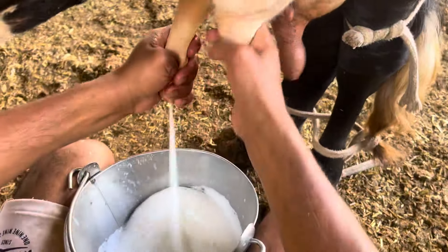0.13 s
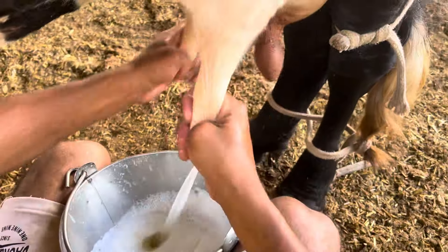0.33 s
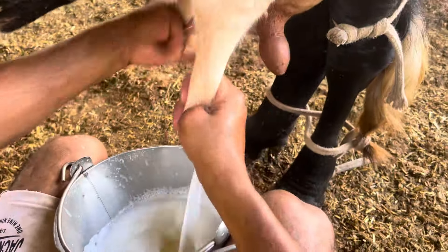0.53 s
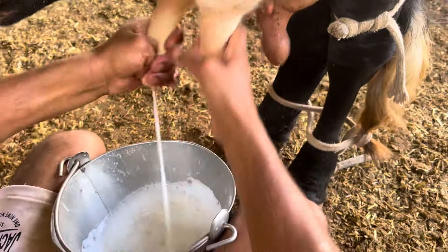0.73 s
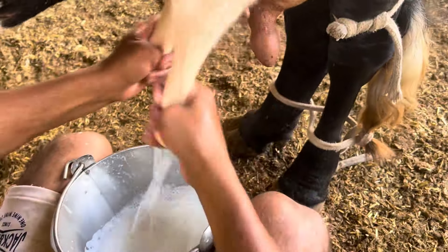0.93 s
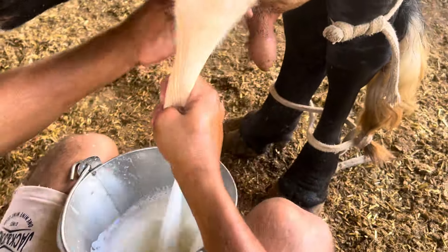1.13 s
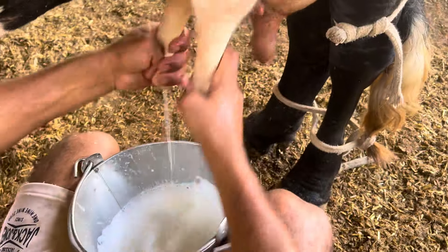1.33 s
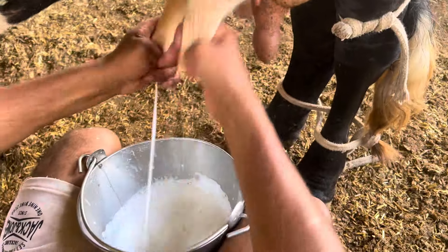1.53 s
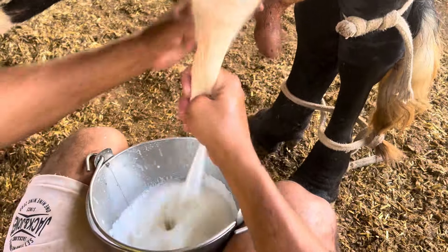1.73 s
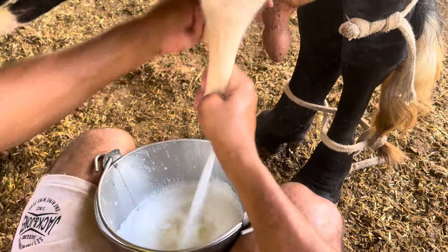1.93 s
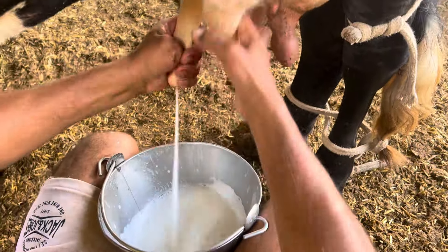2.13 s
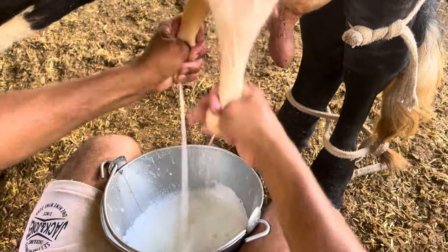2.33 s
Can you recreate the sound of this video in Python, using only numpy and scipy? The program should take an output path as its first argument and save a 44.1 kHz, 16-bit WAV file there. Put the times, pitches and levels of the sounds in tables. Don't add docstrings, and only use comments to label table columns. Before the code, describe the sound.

Alternating spurts of milk rush into foamy liquid in a metal pail, hissing, fizzing and gurgling without long gaps; soft hoof thuds and a brief bird twitter sit far behind, outdoors, heard close in wide stereo.

```python
import sys
import numpy as np
from scipy import signal
from scipy.fft import rfft, irfft, next_fast_len
from scipy.io import wavfile
from scipy.ndimage import uniform_filter1d

SR = 44100
rng = np.random.default_rng(int(sys.argv[2]) if len(sys.argv) > 2 else 0)


def field_ratio(decibels):
    return 10 ** (np.asarray(decibels, dtype=float) / 20)


def wav_record(signal):
    frames = np.transpose(np.atleast_2d(signal))
    bounded = np.clip(frames, -1, 1)
    quanta = np.round(bounded * 32767).astype(np.int16)
    wavfile.write(sys.argv[1], SR, quanta)


N = 108706
T = np.arange(N) / SR

# start [s], length of squeeze [s], hiss [dB], gurgle [dB], rise [s].
LEFT_JETS = [
    (-.02, 0.24, -28.5, -33, 0.075),
    (.665, 0.22, -31.5, -31, 0.088),
    (1.366, .17, -32, -33.5, 0.045),
    (2.076, 0.25, -31.5, -29.5, 0.068),
]
# start [s], length of squeeze [s], hiss [dB], gurgle [dB], rise [s].
RIGHT_JETS = [
    (0.268, 0.295, -30.5, -30, 0.14),
    (0.947, .27, -31, -31, 0.1),
    (1.633, .325, -30.5, -32, 0.15),
    (2.381, 0.17, -32, -29.5, 0.092),
]
START_BELOW_DB, SAG_DB_PER_S = 11, 12
HISS_FADE_DB_PER_S, GURGLE_FADE_DB_PER_S, GURGLE_LAG_S = 205, 132, 0.011

# frequency [Hz], density [dB per Hz].
LEFT_HISS_SPECTRUM = [(700, -0.5), (1250, 0.5), (2100, -6.5), (4000, 1), (6800, -8), (8200, -7),
                      (11500, -10), (16000, -8.5)]
# frequency [Hz], density [dB per Hz].
RIGHT_HISS_SPECTRUM = [(700, -6), (1250, -1.5), (2100, -7), (4300, -6), (6600, -8), (8300, -2.5),
                       (11800, -13.5), (16000, -8.5)]
# frequency [Hz], width [Hz], lift [dB].
LEFT_PAIL_MODES = [(950, 93, 3), (1610, 310, 9), (2590, 167, 7.5), (3330, 130, -6.5), (8600, 2450, 9.5)]
# frequency [Hz], width [Hz], lift [dB].
RIGHT_PAIL_MODES = [(1110, 275, 5.5), (1610, 55, 3), (2430, 210, 1.3), (4320, 710, 3), (5720, 350, 5),
                    (8550, 390, 3)]
FIZZ_PER_S, FIZZ_SHARE, FIZZ_SPREAD_DB = 2500, 0.54, 3.5
FROTH_PATCH_DB = 3.0

# start [s], length [s], pitch [Hz], level [dB].
CRATERS = [(.03, 0.13, 2620, -36), (0.345, 0.23, 947, -42), (0.34, 0.11, 1880, -38.5),
           (0.67, 0.29, 3400, -50), (.7, 0.084, 1530, -36), (.97, 0.2, 1000, -38.5),
           (1.4, 0.049, 3310, -36.5), (1.485, 0.031, 3100, -40), (1.5, 0.08, 1800, -42),
           (0, .035, 1420, -38), (.04, .12, 950, -41), (.39, .1, 2150, -41), (1.69, .05, 2250, -40),
           (1.8, .12, 2000, -43), (2.29, .05, 1800, -38), (2.1, .03, 3270, -40), (1.73, 0.17, 1170, -39.5),
           (.06, 0.081, 2430, -39.5), (1.68, 0.217, 4570, -42.5), (2.2, 0.16, 1785, -41.5),
           (2.23, 0.085, 2800, -45)]
CRATER_BUBBLES_PER_S, CRATER_CYCLES, CRATER_SPREAD = 450, 55, 0.045

# frequency [Hz], level [dB].
BUBBLE_SIZES = [(150, -19), (170, -13), (215, -15.5), (290, 3), (360, -4), (420, 0.5), (520, 6.5),
                (620, -5)]
BUBBLES_PER_S, BUBBLE_CYCLES, BUBBLE_SPREAD_DB, BUBBLE_CLUMP_DB = 900, 18.4, 1.5, 1.63
GURGLE_TRIM_DB = -0.5
# start [s], level
# [dB], pitch [Hz], ringing to -60 dB [cycles].
GULPS = [(.003, -30, 280, 30), (.055, -24, 290, 30), (.865, -26, 180, 12), (.925, -27, 190, 14),
         (1.14, -29, 165, 14), (1.6, -32, 165, 14), (.076, -20.5, 291, 35), (.085, -19.5, 303, 24),
         (.115, -24, 420, 14), (.254, -27, 320, 20), (.297, -23, 320, 21), (.343, -21, 520, 19),
         (.386, -22.5, 427, 14), (.412, -24, 292, 20), (.498, -25, 466, 14), (.533, -20, 278, 21.5),
         (.722, -31, 284, 14), (.732, -22, 394, 14), (.749, -10, 538, 13), (.755, -20, 329, 23),
         (.792, -21, 288, 31), (.815, -21, 289, 28), (.904, -23.5, 380, 20), (.976, -24.5, 413, 17),
         (1.044, -22, 296, 14), (1.197, -26, 446, 17), (1.405, -25.5, 510, 22), (1.482, -24, 554, 33),
         (1.505, -24.5, 290, 18), (1.643, -34, 358, 14), (1.685, -27.5, 393, 16), (1.729, -23.5, 417, 19),
         (1.774, -19.5, 304, 21), (1.844, -22.5, 300, 14), (1.9, -20, 496, 16), (2.088, -25.5, 469, 17),
         (2.128, -22, 261, 25), (2.17, -23, 280, 25), (2.305, -27, 400, 11), (2.426, -18.5, 293, 14)]

# start [s], crack [dB], plop [dB], plop pitch [Hz].
SLAPS = [(.068, -31, -19, 300), (.152, -38, -20, 440), (1.414, -36, -35, 400), (0.716, -27.5, -43, 400),
         (0.749, -27, -26, 700), (.778, -28, -12.5, 310), (1.096, -46, -15, 317), (1.409, -46, -24, 470),
         (1.452, -27, -16.5, 268), (1.497, -25, -24, 480), (1.543, -39, -33, 293), (2.079, -45, -31, 280),
         (2.372, -38, -35, 298), (2.42, -43, -43, 300), (1.368, -38, -35, 315), (1.163, -36, -30, 420),
         (1.589, -40, -24.5, 300), (1.618, -59, -29, 306), (2.196, -45, -17.5, 250), (2.25, -36, -17, 500),
         (2.256, -36, -11, 497)]
# frequency [Hz], level [dB], T60 [s].
WALL_MODES = [(1760, 2.5, 0.0067), (2444, -3.5, 0.011), (2750, -8, 0.0067), (3250, -5, 0.0062),
              (3500, -6.5, 0.0061), (5860, -9, 0.0082)]
CRACK_S, CRACK_DRIVE_DB = 0.004, -15
PLOP_CYCLES, PLOP_RISE = 11, 0.1

# start [s], level [dB], pitch [Hz], length [s].
THUDS = [
    (0.006, -38, 73.4, 0.033),
    (0.856, -27.5, 72.4, 0.039),
    (0.918, -32.5, 68, 0.074),
    (1.009, -39, 69.5, 0.058),
    (1.149, -42, 70, 0.044),
]
# start [s], length [s], start pitch [Hz], end pitch [Hz], level [dB].
BIRD_NOTES = [
    (.532, .024, 5620, 5800, -33),
    (.556, .02, 5750, 5800, -46),
    (.564, .018, 4520, 4480, -34),
    (.57, .014, 5850, 5700, -43),
    (.585, .035, 4500, 4450, -45),
    (.612, .03, 3700, 4800, -41),
    (.634, .022, 4600, 5050, -44),
    (.648, .014, 5050, 4700, -46),
    (.63, .022, 3850, 4700, -46),
    (.643, .018, 4000, 3700, -47),
]
# start [s], level [dB].
CHIRPS = [
    (-.03, -40),
    (1.313, -45),
    (1.555, -49),
    (1.612, -51),
]
CRICKET_HZ, PULSE_S, PULSE_GAP_S = 4235, 0.03, 0.027
# frequency [Hz], density [dB per Hz].
YARD_SPECTRUM = [(30, -24), (65, -8), (130, -9.5), (300, -11), (550, -14), (800, -31), (2000, -30),
                 (5500, -30), (16000, -71)]
YARD_DB = -46

# frequency [Hz], lead of the left [radians].
PORT_PHASE = [(0, 0), (500, .55), (850, 1.9), (1600, 3.4), (2100, 5.8), (3500, 6.3), (7300, 7.3),
              (8500, 6.28), (16000, -6.95)]
# frequency [Hz], left minus right [dB].
PORT_BALANCE = [(600, -.5), (950, 7), (1500, .5), (2800, 5), (3700, 2), (5000, 8), (6900, 11), (8300, 0)]
# frequency [Hz], unrelated share [0-1].
PORT_APART = [(40, .2), (150, .02), (450, .015), (950, .85), (1650, .5), (2200, .8), (3700, .4), (5500, .8),
              (8300, .022)]
PHASE_SNAP, SNAP_FROM_HZ = 0.85, 8000
CUTOFF_HZ = 15870


def rms_one(x):
    return x / np.sqrt(np.mean(x ** 2) + 1e-20)


def at_hz(points, hz):
    p = np.array(points, float)
    return np.interp(np.log(np.maximum(hz, 1)), np.log(np.maximum(p[:, 0], 1)), p[:, 1])


def drift(rate):
    pole = np.exp(-2 * np.pi * rate * 40 / SR)
    chance = rng.standard_normal(N // 40 + 2002)
    slow = signal.lfilter([1], [1, -2 * pole, pole * pole], chance)[2000:]
    return np.interp(np.arange(N) / 40, np.arange(len(slow)), rms_one(slow))


def filtered(x, order, hz, kind="low"):
    return signal.sosfilt(signal.butter(order, hz, kind, fs=SR, output="sos"), x)


def ring(clicks, hz, t60):
    radius, w = field_ratio(-60 / (t60 * SR)), 2 * np.pi * hz / SR
    return signal.lfilter([0, np.sin(w)], [1, -2 * radius * np.cos(w), radius ** 2], clicks + 1e-18)


def grains(per_s, spread_db, size=N):
    height = field_ratio(spread_db * np.minimum(rng.exponential(1, size), 5))
    sign = rng.choice([-1, 1], size)
    return height * sign * (rng.random(size) < per_s / SR)


def burst(s, length, start_hz, end_hz):
    u = np.clip((T - s) / length, 0, 1)
    cycles = length * u * (start_hz + (end_hz - start_hz) * u / 2)
    return np.sin(np.pi * u) * np.sin(2 * np.pi * cycles)


def coloured(source, spectrum, patchy_db, peaks=()):
    out, together = 0, drift(14)
    edges = 25 * 2 ** np.arange(0, 9.5, 1 / 3)
    edges = edges[edges > spectrum[0][0] / 2]
    for k, (low, high) in enumerate(zip(edges, edges[1:])):
        band = filtered(source[k % 2], 2, [low, high], "band")
        flicker_db = patchy_db * (0.34 * together + drift(15.4))
        out = out + band * field_ratio(at_hz(spectrum, np.sqrt(low * high)) + flicker_db)
    for hz, width, lift_db in peaks:
        b, a = signal.iirpeak(hz, hz / width, fs=SR)
        out = out + (field_ratio(lift_db) - 1) * signal.lfilter(b, a, out)
    return rms_one(out)


def squeeze(jets, fade, lag, column):
    gain = np.zeros(N)
    for row in jets:
        u, length, rise = T - row[0] - lag, row[1], max(row[4], 0.005)
        db = row[column] - START_BELOW_DB * np.clip(1 - u / rise, 0, 1)
        db = db - SAG_DB_PER_S * np.clip(u - rise, 0, None)
        db = db - fade * np.clip(u - length + lag, 0, None)
        gain += field_ratio(db) * np.clip(u / 0.003, 0, 1)
    return gain


def hiss(jets, spectrum, pail):
    fizz = np.array([rms_one(grains(FIZZ_PER_S, FIZZ_SPREAD_DB)) for _ in range(4)]).reshape(2, 2, N)
    turbulence = rng.standard_normal((2, 2, N))
    source = np.sqrt(1 - FIZZ_SHARE) * turbulence + np.sqrt(FIZZ_SHARE) * fizz
    closed = [(600, -20)] + list(spectrum)
    return squeeze(jets, HISS_FADE_DB_PER_S, 0, column=2) * coloured(source, closed, 2.3, pail)


def froth(x):
    _, _, cells = signal.stft(x, nperseg=1024)
    patches = uniform_filter1d(rng.standard_normal(cells.shape[1:]), size=4, axis=0)
    patches = uniform_filter1d(patches, size=5, axis=1)
    shifted = cells * field_ratio(FROTH_PATCH_DB * rms_one(patches) - 1.0)
    return signal.istft(shifted, nperseg=1024)[1][:, :N]


def gurgle():
    born = grains(BUBBLES_PER_S * field_ratio(BUBBLE_CLUMP_DB * drift(15)), BUBBLE_SPREAD_DB)
    dealt = rng.integers(0, 24, N)
    rings = np.zeros(N)
    for k, hz in enumerate(np.geomspace(150, 650, 24)):
        rings += field_ratio(at_hz(BUBBLE_SIZES, hz)) * ring(born * (dealt == k), hz, BUBBLE_CYCLES / hz)
    rings = filtered(filtered(rings, 6, 620), 2, 140, "high")
    return rms_one(rings) * squeeze(LEFT_JETS + RIGHT_JETS, GURGLE_FADE_DB_PER_S, GURGLE_LAG_S, column=3)


def craters():
    out, span = np.zeros(N + SR), SR // 3
    for s, length, hz, db in CRATERS:
        rings = np.zeros(span)
        for k in (-1.7, 0.19, 0.19, 0.69, 0.25):
            clicks = grains(CRATER_BUBBLES_PER_S / 5, 3.2, size=span)
            rings += ring(clicks, hz * (1 + CRATER_SPREAD * k), CRATER_CYCLES / hz)
        swell = np.sqrt(np.sin(np.pi * np.clip(T[:span] / length, 0, 1)) + 1e-12)
        i = int(s * SR)
        out[i:i + span] += field_ratio(db) * rms_one(rings) * swell
    return out[:N]


def plops(rows):
    out = np.zeros(N)
    for s, db, hz, length in rows:
        i = int(s * SR)
        cycles = T[:min(SR // 10, N - i)] * hz
        envelope = field_ratio(db - 60 * cycles / length) * np.clip(cycles / 0.47, 0, 1)
        out[i:i + len(cycles)] += envelope * np.sin(2 * np.pi * cycles * (1 + PLOP_RISE * cycles / length))
    return out


def slaps():
    out, chance_db = np.zeros(N), rng.normal(0, 1.5, (len(SLAPS), len(WALL_MODES)))
    wet = filtered(rng.standard_normal(N), 4, 1500, "high")
    strike = np.zeros(N)
    for s, crack_db, _, _ in SLAPS:
        strike += field_ratio(crack_db + CRACK_DRIVE_DB) * (T > s) * np.exp(-np.abs(T - s) / CRACK_S)
    nearest = np.abs(T[:, None] - np.array(SLAPS)[:, 0]).argmin(axis=1)
    for m, (hz, level_db, t60) in enumerate(WALL_MODES):
        out += ring(wet * strike * field_ratio(level_db + chance_db[nearest, m]), hz, t60)
    return out + plops([(s, db, hz, PLOP_CYCLES) for s, _, db, hz in SLAPS])


def echo_tail(x, size, db_per_sample):
    tail = rng.standard_normal(size) * field_ratio(-db_per_sample * np.arange(size))
    return signal.fftconvolve(x, tail / np.sqrt(np.sum(tail ** 2)))[:N]


def hoof():
    return sum(field_ratio(db) * burst(s, length, 0.99 * hz, 0.93 * hz) for s, db, hz, length in THUDS)


def bird():
    notes = sum(field_ratio(db) * burst(s, length, a, b) for s, length, a, b, db in BIRD_NOTES)
    notes = notes * field_ratio(2.0 * drift(200))
    return 0.85 * notes + 0.4 * echo_tail(notes, 900, 0.03)


def cricket():
    out = np.zeros(N)
    for s, db in CHIRPS:
        for k in range(4):
            out += field_ratio(db - 0.61 * k) * burst(s + k * PULSE_GAP_S, PULSE_S, CRICKET_HZ * 1.003, CRICKET_HZ)
    return out


def yard():
    return field_ratio(YARD_DB) * coloured(rng.standard_normal((2, 2, N)), YARD_SPECTRUM, 3.1)


def ports(direct, scattered):
    size = next_fast_len(N + 4096)
    hz = np.fft.rfftfreq(size, 1 / SR)
    p = np.array(PORT_PHASE, float)
    lean, apart = field_ratio(at_hz(PORT_BALANCE, hz)), np.clip(at_hz(PORT_APART, hz), 0, 1)
    turn = np.interp(hz, p[:, 0], p[:, 1])
    for _ in range(2):
        turn = turn - (hz > SNAP_FROM_HZ) * PHASE_SNAP * np.sin(2 * turn) / 2
    a, b = rfft(direct, size), rfft(scattered, size)
    right = np.sqrt(1 - apart) * a * np.exp(-1j * turn) + np.sqrt(apart) * b
    both = np.array([a * lean, right]) * np.sqrt(2 / (1 + lean ** 2))
    return irfft(both, size)[:, :N]


def scene():
    left = hiss(LEFT_JETS, LEFT_HISS_SPECTRUM, LEFT_PAIL_MODES)
    right = hiss(RIGHT_JETS, RIGHT_HISS_SPECTRUM, RIGHT_PAIL_MODES)
    direct, scattered = froth(left + right) + yard()
    direct = direct + field_ratio(GURGLE_TRIM_DB) * gurgle() + craters()
    scattered = scattered + field_ratio(GURGLE_TRIM_DB) * gurgle() + craters()
    hits = slaps() + plops(GULPS)
    bounced = filtered(echo_tail(hits, 200, 0.2), 4, 1200, "high")
    far = bird() * field_ratio(np.array([[3], [-4]])) + cricket() * field_ratio(np.array([[4], [-5]]))
    return ports(direct + hits + hoof(), scattered + bounced) + far


def low_pass(x):
    return signal.sosfilt(signal.butter(12, 17100, fs=SR, output="sos"), x)


def record(dry):
    mix = signal.sosfilt(signal.ellip(12, 0.3, 70, CUTOFF_HZ, fs=SR, output="sos"), dry)
    return low_pass(mix)


dry = scene()
out = record(dry)
wav_record(out)
```